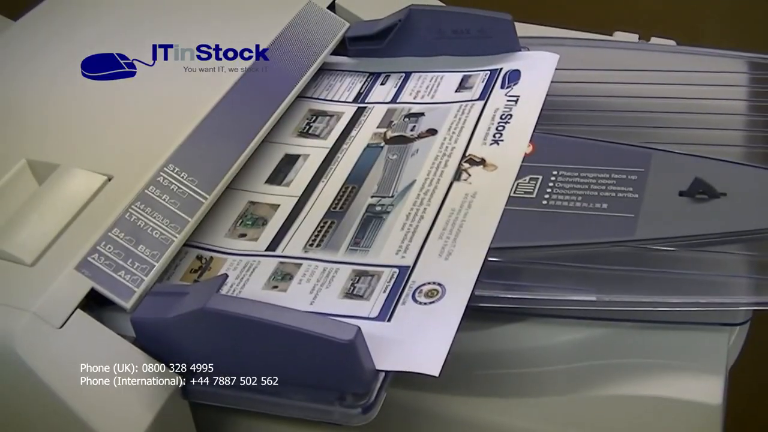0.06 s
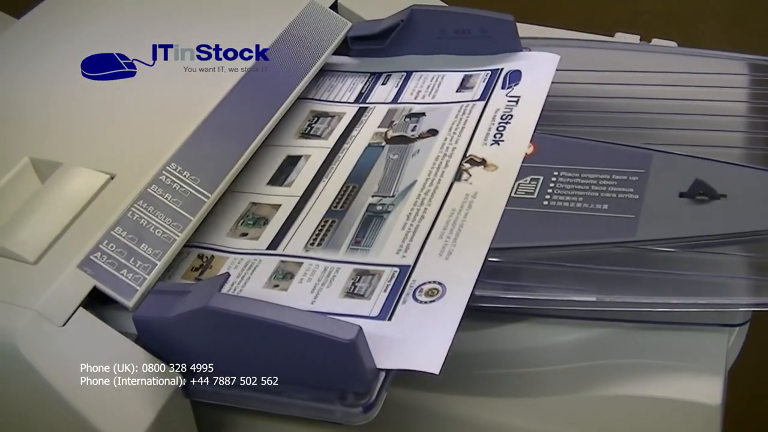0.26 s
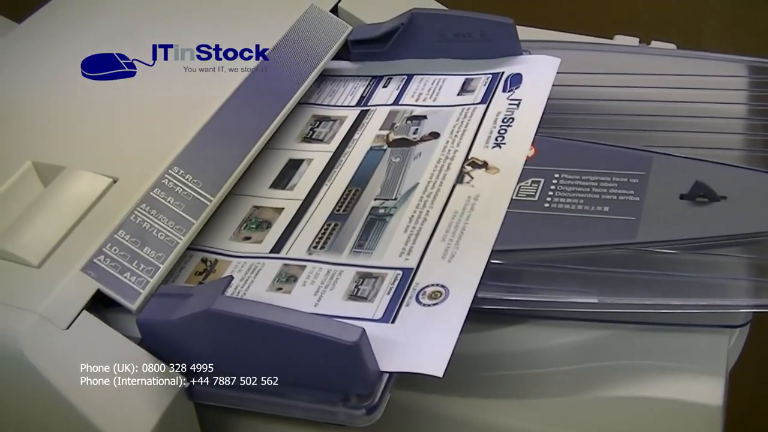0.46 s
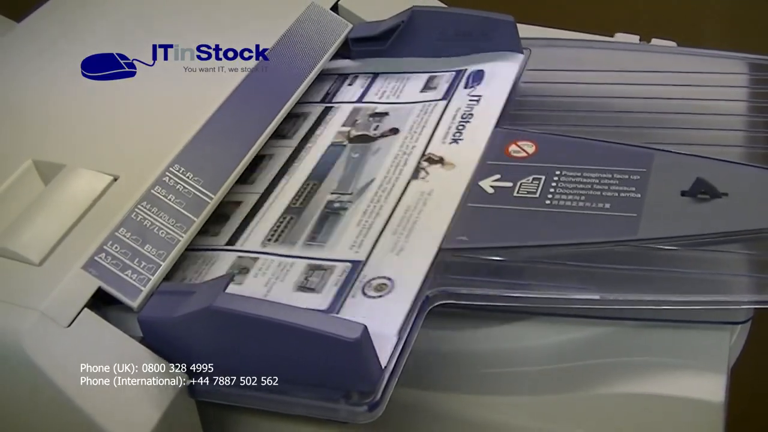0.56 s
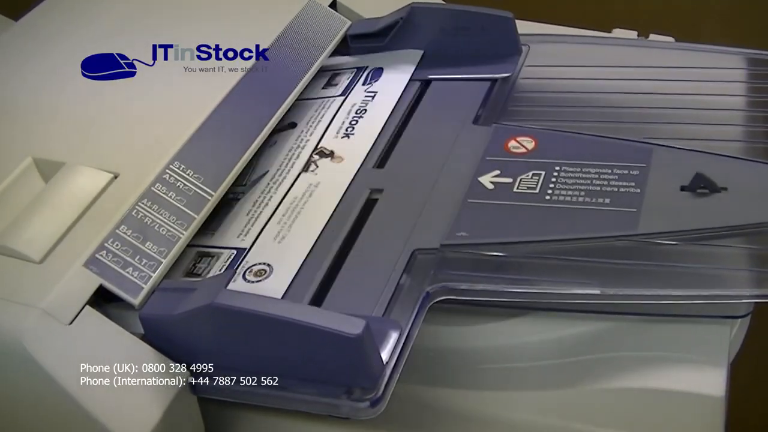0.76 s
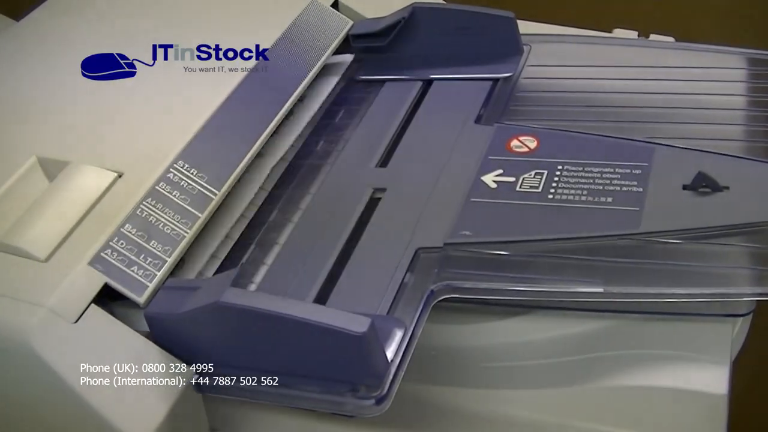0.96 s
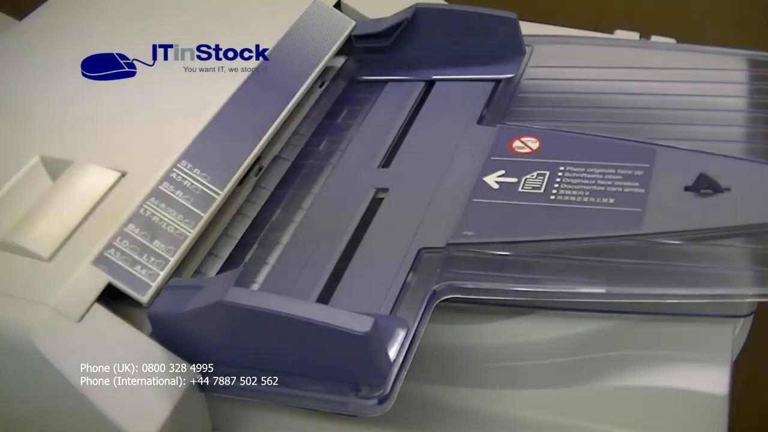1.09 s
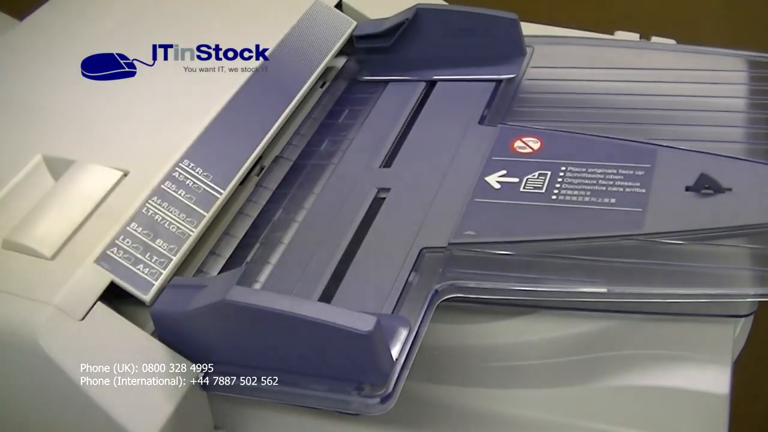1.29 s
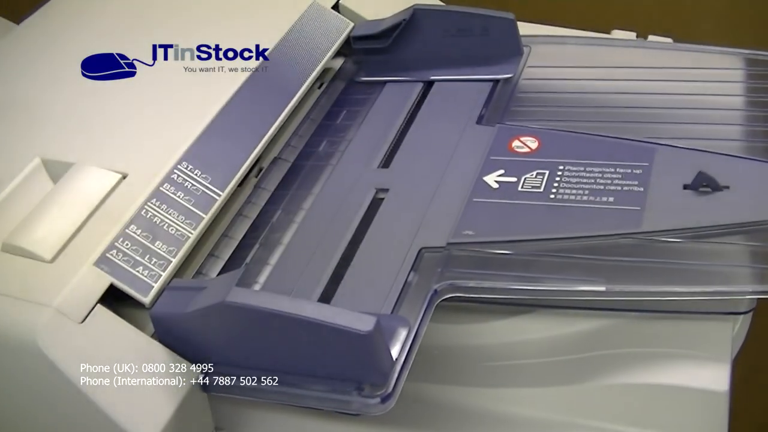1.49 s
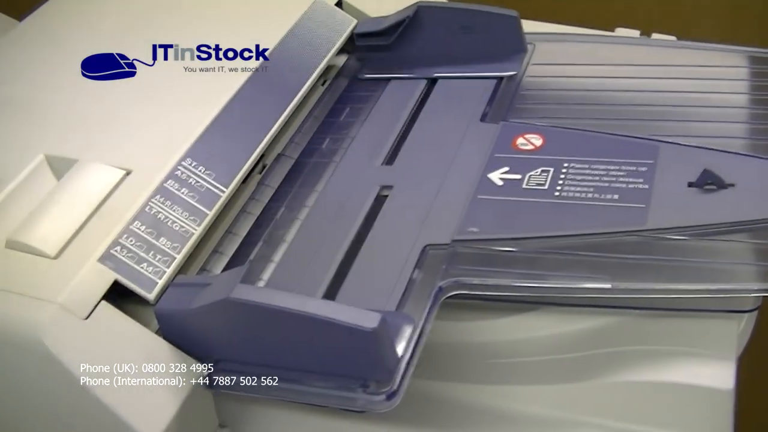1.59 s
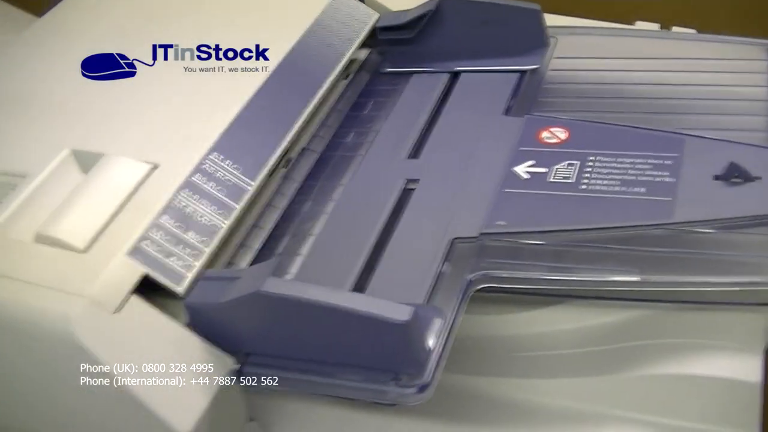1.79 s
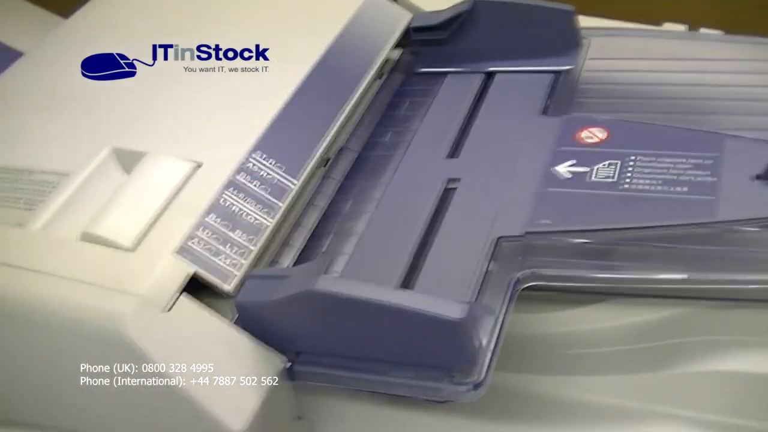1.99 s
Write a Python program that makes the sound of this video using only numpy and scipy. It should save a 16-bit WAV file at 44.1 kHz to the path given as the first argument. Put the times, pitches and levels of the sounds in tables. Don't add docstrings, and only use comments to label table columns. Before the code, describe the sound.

A copier document feeder takes in one sheet, close up in a small, slightly reflective office. Low fan hum and tiny ticks come first; at 0.23 s a loud plastic clunk rattles on to 0.4. From 0.55 paper hisses over grinding gears, with sharp clacks near 0.8, a whine and jolt around 0.9-1.0, another snap at 1.3, a brief higher whine at 1.4, then steady motor whir with a clack at 1.74.

```python
import sys
import numpy as np
from scipy import signal
from scipy.fft import rfft, irfft, next_fast_len
from scipy.io import wavfile

SR = 44100
rng = np.random.default_rng(int(sys.argv[2]) if len(sys.argv) > 2 else 0)


def gain_from_db(level_db):
    decades = np.asarray(level_db, float) / 20
    return 10 ** decades


def pcm_store(signal):
    levels = np.round(np.clip(np.atleast_2d(signal), -1, 1) * 32767)
    wavfile.write(sys.argv[1], SR, levels.astype(np.int16).T)


N = 90404


def rms_one(x):
    return x / np.sqrt(np.mean(x ** 2) + 1e-20)


def gain_over_time(rows):
    s, db = np.transpose(rows)
    return gain_from_db(np.interp(np.arange(N) / SR, s, db))


def coloured(x, spectrum, skirt_db=24):
    hz, db = np.transpose(spectrum)
    size = next_fast_len(len(x) + 4096)
    octave = np.log2(np.arange(size // 2 + 1) * SR / size + 1)
    below = np.maximum(np.log2(hz[0]) - octave, 0)
    above = np.maximum(octave - np.log2(hz[-1]), 0)
    gain_db = np.interp(octave, np.log2(hz), db) - skirt_db * (below + above)
    return irfft(rfft(x, size) * gain_from_db(gain_db), size)[:len(x)]


def drift(rate_hz):
    r = np.exp(-2 * np.pi * rate_hz / SR)
    noise = rng.standard_normal(N + SR)
    return rms_one(signal.lfilter([1], [1, -2 * r, r * r], noise)[SR:])


def resonate(x, hz, width_hz):
    r = np.exp(-np.pi * width_hz / SR)
    poles = [1, -2 * r * np.cos(2 * np.pi * hz / SR), r * r]
    return signal.lfilter([(1 - r * r) / 2, 0, (r * r - 1) / 2], poles, x)


def grains(size, per_s, spread_db):
    chance, strength, sign = rng.random((3, size))
    strength_db = spread_db * np.minimum(-np.log(strength + 1e-9), 4)
    return (chance < per_s / SR) * gain_from_db(strength_db) * np.sign(sign - .5) + 1e-9


def burst(rise_s, length_s, fall_s, size=6000):
    t = np.arange(size) / SR
    hold_s = np.clip(length_s, 0, .024)
    shape = np.minimum(t / rise_s, 1) * np.exp(-np.maximum(t - hold_s, 0) / fall_s)
    first_contact = 6.0 * (np.arange(size) == int(rise_s * SR))
    return shape * (grains(size, per_s=5000, spread_db=3.0) + first_contact)


def add(out, s, sound, db):
    i = int(s * SR)
    out[i:i + len(sound)] += (gain_from_db(db) * sound / np.abs(sound).max())[:len(out) - i]


def office(x):
    t60_s, wall_cut_hz = 0.25, 2800
    size = next_fast_len(N + SR)
    w = 2 * np.pi * np.arange(size // 2 + 1) / size
    dull = 1 / (1 + 1j * w * SR / (2 * np.pi * wall_cut_hz))
    response = 0
    for k, lag_s in enumerate(rng.uniform(.008, 0.032, 8)):
        loop = gain_from_db(-60 * lag_s / t60_s) * dull * np.exp(-1j * w * lag_s * SR)
        response = response + (-1) ** k * loop / (1 - loop)
    return irfft(response * rfft(x, size), size)[:N]


def fan():
    # frequency in Hz, level in dB
    air_spectrum = [(30, -23), (100, -16.5), (150, -8), (300, -28), (450, -16), (1200, -25), (3000, -37.5),
                    (15800, -52)]
    air_db, blade_db = -50.5, -45
    blade_hz, blade_width_hz = 178.5, 7
    noise = rng.standard_normal((2, N))
    air = rms_one(coloured(noise[0], air_spectrum))
    blurred = resonate(resonate(noise[1], blade_hz, blade_width_hz), blade_hz, 21.0)
    steady = np.sin(2 * np.pi * blade_hz * np.arange(N) / SR)
    return gain_from_db(air_db) * air + gain_from_db(blade_db) * rms_one(.5 * rms_one(blurred) + steady)


def paper():
    # time in seconds, level in dB
    slide = [(.5, -93), (.545, -52), (.58, -30), (.7, -32), (.77, -33), (.825, -28), (.845, -82),
             (.862, -57), (.87, -41), (.93, -37), (.97, -21), (1.05, -33), (1.075, -37.5), (1.125, -34),
             (1.3, -35), (1.34, -51), (1.49, -58.5), (1.52, -38), (2.05, -45)]
    # frequency in Hz, level in dB per Hz
    hiss_spectrum = [(1760, 5), (3000, -1), (3640, -8.5), (4430, -3), (4950, -6), (9910, -10),
                     (15800, -28.5)]
    fibres = grains(N, per_s=5400, spread_db=-1.0)
    hiss = rms_one(coloured(fibres, hiss_spectrum, skirt_db=10.0))
    moving = np.arange(N) > slide[0][0] * SR
    return gain_over_time(slide) * gain_from_db(1.2 * drift(13)) * hiss * moving


def motors():
    # start in
    # seconds, end in seconds, start pitch in Hz, end pitch in Hz, # roughness (radians of phase and share of
    whines = [(.859, .919, 1590, 1615, .2), (.912, .975, 1612, 1600, .4), (1.385, 1.456, 2160, 2200, .35),
              (1.456, 1.497, 2215, 2235, .15), (.6, .77, 4570, 4500, 1.2), (.655, .775, 1985, 2015, .5),
              (1.545, 1.72, 1421, 1421, .3), (1.53, 1.69, 608, 608, .6), (1.69, 2.1, 608, 608, .25),
              (1.53, 2.1, 797, 797, .25), (1.55, 2.1, 1599, 1599, .3), (.803, .858, 1570, 1590, .3),
              (1.39, 1.5, 525, 575, .2), (1.13, 1.29, 14600, 14600, .6), (1.72, 2.1, 1195, 1195, .5),
              (1.72, 2.1, 1390, 1390, .6), (1.53, 2.1, 885, 885, .6), (1.75, 2.1, 13900, 13900, .8)]
    whine_db = [-24, -27, -49, -45, -48, -45, -39, -45, -38, -43, -45, -36, -47, -64, -46, -47, -46, -75]
    edge_s, wobble_hz = .006, 45
    t, out = np.arange(N) / SR, np.zeros(N)
    for (start, end, hz0, hz1, rough), db in zip(whines, whine_db):
        gate = np.clip(np.minimum(t - start, end - t) / edge_s, 0, 1)
        pitch = np.interp(t, [start, end], [hz0, hz1])
        phase = 2 * np.pi * np.cumsum(pitch) / SR + rough * drift(wobble_hz)
        strength = 1 + rough * drift(wobble_hz)
        out += gain_from_db(db + 2.0) * gate * strength * np.sin(phase)
    return out


def housing(x, spread_db):
    # pitch in Hz, width in Hz, level in dB
    panels = [(772, 275, -3), (1000, 196, 0.5), (1200, 180, -5), (1614, 50, -11), (2120, 94, -13),
              (2776, 196, -5.5), (3200, 260, -9), (510, 90, -5)]
    draws_db = rng.normal(0, spread_db, len(panels))
    rings = 0
    for k, ((hz, width_hz, db), draw_db) in enumerate(zip(panels, draws_db)):
        rings = rings + (-1) ** k * gain_from_db(db + draw_db) * resonate(x, hz, width_hz)
    return rings + gain_from_db(-7) * resonate(x, 800, 1800)


def gears():
    # time in seconds, level in dB
    load = [(0, -48), (.23, -51.5), (.25, -21), (.39, -36.5), (.43, -42), (.525, -45.5), (.56, -28),
            (.77, -44), (.87, -27.5), (1.0, -38), (1.09, -29.5), (1.13, -31), (1.33, -27.5), (1.37, -42.5),
            (1.49, -42.5), (1.53, -35.5), (1.75, -32.5), (2.05, -38)]
    # frequency in Hz, level in dB per Hz
    frame_spectrum = [(65, -78), (110, -13), (173, -1), (239, -4.5), (307, 6.5), (496, -3), (536, -5),
                      (803, 0), (4500, -29.5), (5850, -91), (9900, -120)]
    teeth = grains(N, per_s=2500, spread_db=2.0)
    body = rms_one(coloured(teeth, frame_spectrum)) + 0.19 * rms_one(housing(teeth, 0))
    return gain_over_time(load) * gain_from_db(2.83 * drift(12.3)) * rms_one(body)


def thumps():
    # start in seconds, peak in dB, pitch in Hz,
    # length in seconds
    pushes = [(0.234, -19.5, 305, 0.0082), (0.25, -8, 361, 0.0092), (0.298, -14, 338, 0.004),
              (0.338, -18.5, 305, 0.012), (0.531, -17, 344.6, 0.0096), (0.544, -15, 288, 0.013),
              (0.855, -16.5, 349, 0.008), (0.97, -14, 303, 0.0047), (0.983, -15, 334, 0.014),
              (1.044, -23.5, 320, 0.011), (1.119, -26.5, 322, 0.025), (1.209, -32, 320, 0.014),
              (1.263, -25, 360, 0.0099), (1.326, -19.5, 336, 0.005), (1.499, -13.5, 327, 0.0105),
              (1.514, -20, 363, 0.0091), (1.689, -25.5, 258, 0.0043), (1.712, -17.5, 346, 0.014),
              (1.771, -19.5, 268.5, 0.017), (1.815, -45, 316, 0.0077)]
    # start in seconds, peak in dB, pitch in Hz, length in seconds
    shudders = [
        (.285, -34.5, 142, 0.027),
        (.335, -32, 160, .03),
        (0.975, -18.5, 178, 0.028),
    ]
    rise_s, fall_s, width_hz = .005, 0.009, 60
    overtone, overtone_db, rattle_db = 2.1, -15, -4
    out, t = np.zeros(N), np.arange(6000) / SR
    soft = signal.butter(2, 1400, fs=SR, output="sos")
    for s, db, hz, length_s in [*pushes, *shudders]:
        push = signal.sosfilt(soft, burst(rise_s, length_s, fall_s))
        shape = np.minimum(t / rise_s, 1) * np.exp(-np.maximum(t - length_s, 0) / fall_s)
        rock = shape * np.sin(2 * np.pi * hz * t)
        low = resonate(resonate(push, hz, width_hz), hz, 0.2 * hz)
        rattle = low + gain_from_db(overtone_db) * resonate(push, overtone * hz, 2 * hz)
        add(out, s - .002, rms_one(rock) + gain_from_db(rattle_db) * rms_one(rattle), db + 1.0)
    return out


def snaps():
    # start in seconds, peak in dB, housing share in dB,
    # length in seconds, pitch of the panel struck in Hz
    contacts = [(0.231, -27, 11.5, 0.0044, 1930), (0.2335, -10, -3, 0.0031, 4670),
                (.239, -9, -0.5, 0.024, 1770), (0.251, -2, -6.5, 0.0061, 1370),
                (.2555, -27, 10.5, 0.012, 1870), (0.2773, -19.5, 11, 0.005, 2300),
                (0.28, -19.5, 16, 0.015, 1010), (0.288, -21, 12, 0.003, 1300),
                (0.2908, -16.5, 10.5, 0.011, 1210), (0.302, -27, 19, 0.0086, 810),
                (0.321, -30.5, 20.5, 0.03, 1255), (0.3268, -27, 17, 0.014, 2290),
                (0.34, -27, 18, 0.0089, 740), (0.352, -27, 11.5, 0.0065, 2270),
                (0.367, -29.5, 12.5, 0.0052, 2060), (0.379, -16.5, 1.5, 0.0098, 3020),
                (0.387, -29.5, 11, 0.0041, 2290), (0.575, -20.5, -0.5, 0.0046, 2320),
                (0.7768, -9.5, 0, 0.002, 3360), (0.779, -14.5, -3.5, 0.0071, 2070),
                (0.784, -17.5, 4.5, 0.009, 980), (0.8014, -5, -4, 0.0059, 2080),
                (0.8059, -13, 10.5, 0.0034, 1550), (.815, -23.5, 11, 0.0093, 875),
                (0.8686, -20.5, 2.5, 0.0033, 1600), (0.932, -16.5, 1, 0.027, 1070),
                (0.955, -22, 5.5, 0.0092, 1600), (0.9654, -16, 4.5, 0.007, 1330),
                (0.972, -11.5, 5.5, 0.0046, 1310), (0.98, -11, -0.5, 0.011, 1050),
                (1.03, -23, 7.5, 0.0022, 3850), (1.047, -11, -3, 0.0052, 1510),
                (1.12, -17, -1, 0.0037, 3000), (1.292, -13.5, -1, 0.0064, 1244),
                (1.295, -3.5, -3, 0.006, 2180), (1.3, -18, 5, 0.0095, 2880), (1.308, -33, 0, 0.0052, 1210),
                (1.678, -23.5, 1.5, 0.042, 2280), (1.696, -19, -1, 0.014, 1460),
                (1.736, -10, -3, 0.011, 2290)]
    # start in seconds, peak in dB, housing share in dB
    ticks = [(.010, -50.5, 18.5), (0.0532, -38, 12.5), (0.063, -28.5, 13.5), (0.067, -46, 5),
             (0.08, -23.5, 0), (0.543, -22.5, 0.5), (0.5499, -27, 13), (1.347, -27, -15), (1.349, -23, -1),
             (1.373, -26.5, -4), (1.3765, -28.5, 3.5), (1.431, -29, -13), (1.434, -30, 2)]
    # frequency in Hz, level in dB per Hz
    crack_spectrum = [(2500, -4.5), (3300, 4.5), (3800, -3), (4600, -0.5), (6000, -2), (10000, -7.5),
                      (13400, -18), (15800, -36)]
    tick_s, tick_panel_hz, tick_ping_hz = .0028, 1500, 4200
    rise_s, dull_per_share = .0008, 0.4
    struck_db, struck_width_hz = 9, 150
    out = np.zeros(N)
    panel = signal.butter(2, 6220, fs=SR, output="sos")
    high = signal.butter(4, 2400, "high", fs=SR, output="sos")
    for s, db, share_db, length_s, hz in [*contacts, *[(*tick, tick_s, tick_panel_hz) for tick in ticks]]:
        hit = burst(rise_s, length_s, fall_s=max(length_s, tick_s))
        crack = coloured(hit, crack_spectrum)
        if length_s == tick_s:
            crack = crack + resonate(hit, tick_ping_hz, 210.0)
        dull_hz = min(10500 * gain_from_db(-dull_per_share * share_db), 16000)
        dull = signal.butter(2, dull_hz, fs=SR, output="sos")
        add(out, s, signal.sosfilt(np.vstack([high, dull]), crack), db)
        struck = gain_from_db(struck_db) * resonate(hit, hz, struck_width_hz)
        body = housing(hit, spread_db=2.5) + struck
        add(out, s, signal.sosfilt(panel, body), db + share_db - 0.5)
    return out


def ports(x):
    # frequency in Hz, level in dB per Hz
    rumble_spectrum = [(20, 0), (60, -2), (200, -15)]
    side_db, smear_s, rumble_db = -26, .006, -79.5
    t = np.arange(1000) / SR
    smear = rng.standard_normal(len(t)) * np.exp(-t / smear_s)
    side = np.convolve(x, smear / np.linalg.norm(smear))[:N]
    low_pass = signal.butter(6, 13000, fs=SR, output="sos")
    high_pass = signal.butter(1, 400, "high", fs=SR, output="sos")
    side = signal.sosfilt(np.vstack([low_pass, high_pass]), side)
    rumble = gain_from_db(rumble_db) * rms_one(coloured(rng.standard_normal(N), rumble_spectrum))
    return (gain_from_db(side_db) * side + rumble) * np.array([[1], [-1]])


def scene():
    feeder = paper() + motors() + gears() + thumps() + snaps()
    feeder = signal.sosfilt(signal.butter(4, 125, "high", fs=SR, output="sos"), feeder)
    office_db = -18
    mid = feeder + gain_from_db(office_db) * office(feeder) + fan()
    return mid + ports(mid)


def band_limit(x):
    return signal.sosfilt(signal.butter(12, 15940, fs=SR, output="sos"), x)


def record(dry):
    rounded = 1.663 * np.tanh(dry / 1.404)
    top_cut = signal.cheby2(20, 70, 15990, fs=SR, output="sos")
    return band_limit(signal.sosfilt(top_cut, rounded))


dry = scene()
out = record(dry)
pcm_store(out)
```